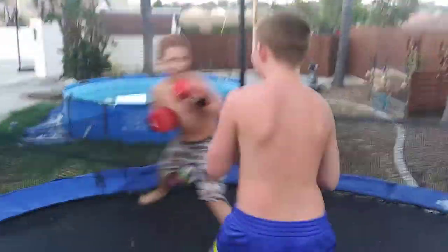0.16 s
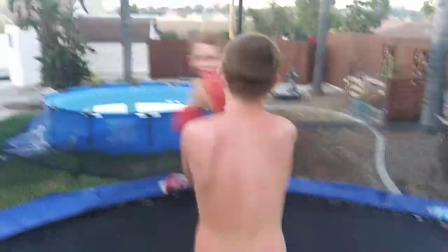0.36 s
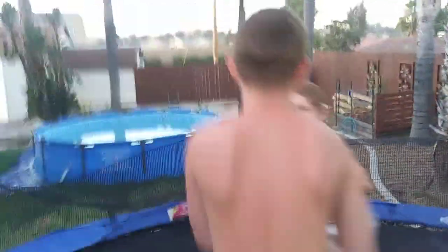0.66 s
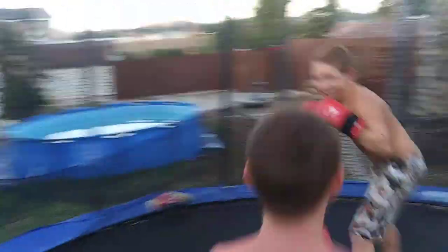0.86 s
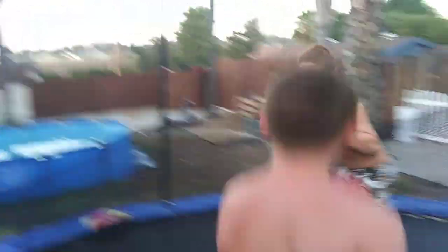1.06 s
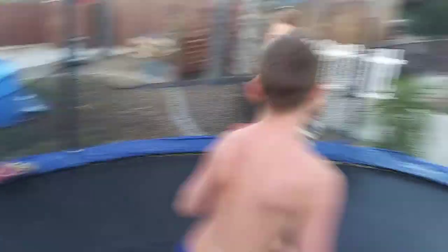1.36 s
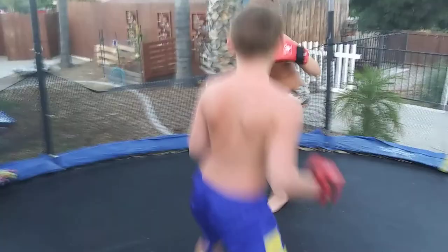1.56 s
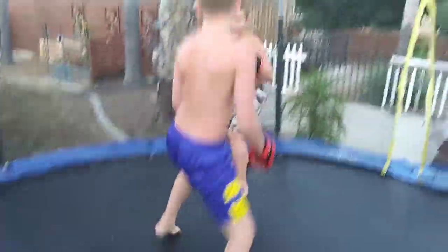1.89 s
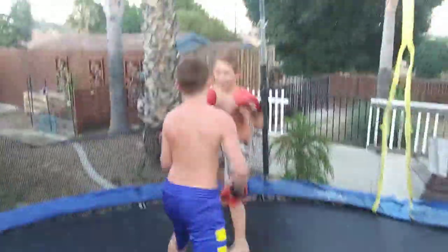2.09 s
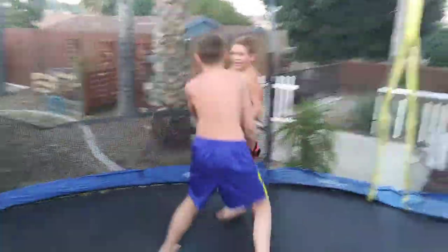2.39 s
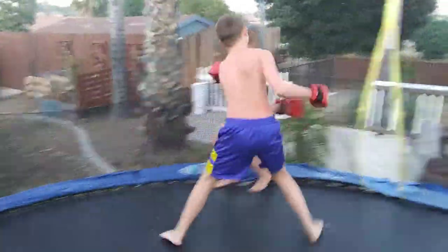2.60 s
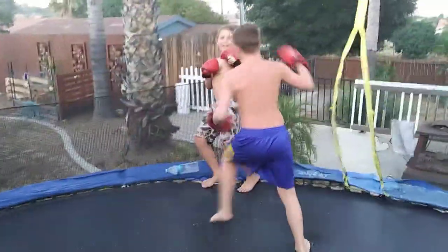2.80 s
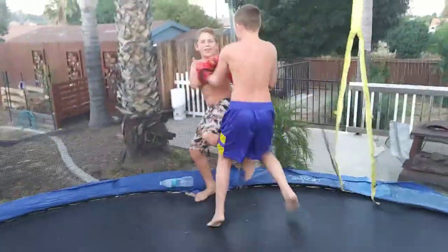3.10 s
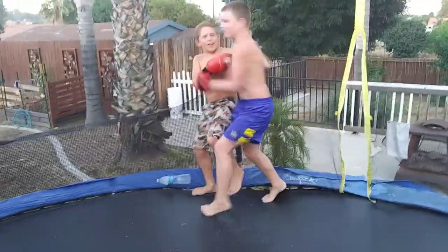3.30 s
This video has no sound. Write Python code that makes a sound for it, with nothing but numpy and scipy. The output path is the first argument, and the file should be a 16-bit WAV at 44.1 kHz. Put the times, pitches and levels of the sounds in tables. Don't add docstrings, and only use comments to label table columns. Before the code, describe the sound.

Trampoline mat and springs rattle under shuffling feet, ending in one sharp glove punch

```python
import sys
import numpy as np
from scipy import signal
from scipy.io import wavfile
from scipy.ndimage import uniform_filter1d

SR = 44100
rng = np.random.default_rng(int(sys.argv[2]) if len(sys.argv) > 2 else 0)


def decibels_to_gain(level_db):
    exponent = np.asarray(level_db, float) / 20
    return 10 ** exponent


def output_pcm(signal):
    pcm = np.clip(np.atleast_2d(signal).T, -1, 1) * 32767
    wavfile.write(sys.argv[1], SR, np.round(pcm).astype(np.int16))


N = 152145
CONTROL_STEP = 32
CONTROL_SIZE = N // CONTROL_STEP + 2

# peak_s, level_db, rise_s, fall_s, tilt_db_per_octave
DRAGS = [(.006, -32, 0.035, 0.045, -3), (.08, -31, 0.024, 0.12, -1.5), (.111, -30, 0.0055, 0.023, -3),
         (.15, -35, 0.024, 0.061, -2.5), (.28, -29.5, 0.051, 0.022, -1.5), (.341, -32.5, 0.026, 0.014, -2),
         (.375, -27.5, 0.014, 0.02, -1.5), (.43, -38, 0.025, 0.053, -1), (.487, -34, 0.0057, 0.0099, -2.5),
         (.56, -36.5, 0.016, 0.06, 0.5), (.7, -37.5, 0.086, 0.051, -3.5), (.853, -27.5, 0.0034, 0.033, -1),
         (1.572, -34.5, 0.012, 0.014, 0.5), (1.541, -38.5, 0.0027, 0.037, 1.5),
         (1.987, -41.5, 0.0065, 0.25, -3), (2.165, -29.5, 0.002, 0.017, 1.5),
         (2.21, -31.5, 0.065, 0.061, 0), (2.502, -27, 0.03, 0.021, -0.5), (2.602, -23, 0.025, 0.04, -1.5),
         (2.67, -31, 0.02, 0.038, -1), (3.139, -36, 0.037, 0.015, -1), (3.23, -39, 0.016, 0.18, -2.5),
         (3.334, -26, 0.006, 0.0039, -1), (3.41, -33, 0.096, 0.0091, -0.5)]
# peak_s, level_db, rise_s, fall_s, tilt_db_per_octave
SLIDES = [(.24, -30, 0.015, 0.024, 0), (.641, -31, 0.026, 0.027, 1), (.794, -33, 0.04, 0.046, 0),
          (.87, -28, 0.011, 0.0087, 1), (.91, -30, 0.028, 0.048, 0), (.965, -31.5, 0.011, 0.031, -0.5),
          (1.121, -40, 0.047, 0.02, 0), (1.163, -32.5, 0.022, 0.03, 0.5), (1.265, -31, 0.025, 0.035, 0.5),
          (1.302, -34.5, 0.013, 0.0056, -1), (1.225, -41, .006, .02, 0.5),
          (1.413, -31.5, 0.033, 0.022, -0.5), (1.489, -42, 0.01, 0.0075, 0.5),
          (1.654, -37.5, 0.061, 0.097, -0.5), (1.852, -35, 0.021, 0.0078, 1),
          (1.874, -32.5, 0.0095, .016, 0), (2.033, -26.5, 0.0028, 0.011, 1), (2.096, -32, 0.003, 0.0093, 2),
          (2.46, -35, 0.043, 0.065, 0), (2.55, -31, 0.0056, 0.06, 1), (2.74, -27.5, 0.034, 0.058, 0),
          (2.79, -26, 0.0097, 0.016, 1), (2.824, -31, 0.0077, 0.0058, 1), (3.0, -31.5, 0.06, 0.029, -0.5),
          (3.039, -27, 0.023, 0.017, 0.5), (3.091, -32, 0.015, 0.011, 2)]
# freq_hz, density_db_per_hz
DRAG_SPECTRUM = [(88, -86), (150, -44.5), (790, -11), (2400, -0.5), (5570, -3.5), (10200, -12),
                 (16000, -22)]
# freq_hz, density_db_per_hz
SLIDE_SPECTRUM = [(88, -71), (150, -34.5), (1480, -4), (1980, -3), (4670, -1), (10600, -13), (16000, -28.5)]
# freq_hz, density_db_per_hz
YARD_SPECTRUM = [(18, -69), (30, -39), (70, -33.5), (415, 0), (2750, 2), (5740, -6.5), (10800, -20.5),
                 (16000, -22)]
YARD_DB = -45
RISE_SHAPE, FALL_SHAPE = 2.4, 1.02
GRIT_PER_S, GRIT_SPREAD_DB, GRIT_SHARE = 2500, 4, 0.58

SPRING_T60_S, SPRINGS_DB, SPRINGS_PATCHY_DB = 0.057, -11.5, 7

# start_s, length_s, level_db, centre_hz, width_hz
SHEENS = [(.105, 0.012, -32, 4130, 500), (.106, 0.019, -29, 2340, 600), (0.121, 0.032, -33.5, 2090, 150),
          (0.224, 0.045, -37, 4085, 100), (.232, 0.023, -38.5, 2490, 150), (0.604, 0.043, -40.5, 8600, 900),
          (0.619, 0.076, -40, 5200, 900), (.77, 0.046, -45, 11000, 1200), (.785, 0.023, -46, 9000, 500),
          (0.846, .012, -39, 2480, 500), (.858, .018, -36.5, 9900, 1200), (.88, .012, -42, 11000, 1200),
          (0.947, 0.079, -44.5, 10860, 1000), (1.15, 0.048, -47, 5400, 200),
          (1.269, 0.051, -40, 8100, 2500), (1.243, 0.066, -52, 14000, 3500),
          (1.394, 0.049, -50, 14000, 3500), (2.153, .02, -49, 12000, 5000),
          (1.396, 0.035, -47.5, 10500, 805), (1.401, 0.044, -40, 5200, 900), (1.407, 0.037, -43, 2760, 200),
          (1.552, .04, -48, 11400, 800), (1.656, .035, -56, 5270, 120), (1.978, 0.018, -41, 4730, 350),
          (2.464, 0.059, -32, 4480, 1500), (2.575, 0.065, -30.5, 4460, 1500),
          (2.698, .05, -38.5, 4620, 500), (2.78, 0.045, -39.5, 1516, 150), (3.216, 0.059, -49, 6500, 1200),
          (3.322, 0.0098, -38, 4540, 700), (3.334, .008, -31, 3900, 900), (3.353, 0.014, -29.5, 4200, 2580),
          (3.373, .011, -29.5, 4740, 2640)]

# start_s, length_s, slip_rate_hz, level_db, loudest_ring_hz
SQUEAKS = [
    (0.182, 0.031, 865, -31.5, 1720),
    (1.203, 0.026, 754, -45, 1520),
    (1.55, 0.038, 870, -44, 1760),
    (1.843, 0.02, 900, -46, 1800),
    (1.98, 0.015, 1160, -43.5, 2300),
    (2.486, 0.036, 890, -39, 1720),
]
# start_s, length_s, slip_rate_hz, level_db, loudest_ring_hz
CREAKS = [
    (.896, .027, 592, -32, 2950),
    (1.142, .02, 510, -40, 2550),
]
# start_s, length_s, slip_rate_hz, level_db, loudest_ring_hz
GROAN = [
    (1.084, .056, 532, -35.5, 2580),
]
SQUEAK_SAG, GROAN_SAG, SQUEAK_JITTER = 0.04, 0.15, 0.006
RING_WIDTH_OCT, COIL_WIDTH_OCT, COIL_HZ = 0.15, 0.06, 5200
FLICKER_DB = 4

# start_s, peak_db, pitch_hz
TICKS = [(0.221, -34, 4070), (0.8674, -17, 6200), (1.1619, -23, 5200), (1.7534, -25.5, 6000),
         (2.0323, -24, 4130), (2.165, -16.5, 3270), (2.1851, -19.5, 5700), (2.3705, -22.5, 4670),
         (2.4085, -22.5, 4730), (2.4266, -18.5, 4800), (2.4478, -22, 5540), (2.461, -21, 5400),
         (2.7576, -14, 4560), (2.78, -20, 5400), (3.086, -16.5, 4450), (3.278, -18, 3500),
         (3.29, -22.5, 2920), (3.316, -32, 3200), (1.5386, -31, 6500), (1.7813, -29, 4130),
         (1.8535, -25, 5000), (1.8698, -23.5, 4840)]
TICK_T60_S, TICK_DB = 0.0049, -3
TICK_TAIL_T60_S, TICK_TAIL_DB = 0.058, -10

# start_s, peak_db, pitch_hz, t60_s
KNOCKS = [(0.2995, -18.5, 1670, 0.004), (.317, -15.5, 610, 0.0034), (0.3686, -21.5, 990, 0.033),
          (3.0627, -18, 1400, 0.0096), (3.0727, -18.5, 760, 0.0074), (3.28, -6.5, 1020, 0.0055),
          (3.2879, -20.5, 814, 0.02), (3.3, -26, 990, 0.021), (3.316, -22, 754, 0.012),
          (3.337, -23.5, 920, 0.012), (3.341, -25.5, 860, 0.016)]
KNOCK_PUFF_DB, KNOCK_PUFF_LONGER = -13, 2.8
# freq_hz, peak_db, t60_s, delay_s
PUNCH = [
    (1500, -6, .0025, 0),
    (4200, -15, .004, 0),
    (2900, -16, .002, 0),
    (700, -6, .011, .0004),
]
PUNCH_S = 3.2747

# start_s, level_db, t60_s, rise_s
HEELS = [
    (.365, -29, 0.097, .002),
    (1.235, -39, 0.26, 0.0086),
    (2.161, -31, 0.098, 0.0017),
    (2.198, -37.5, 0.1, 0.0023),
    (2.321, -49, .1, 0.004),
    (2.445, -39, 0.069, 0.0023),
    (2.933, -33, 0.12, 0.0019),
    (3.062, -35, 0.22, 0.0019),
    (3.278, -45, 0.28, 0.0093),
]
HEEL_LOW_HZ, HEEL_HIGH_HZ = 285, 1400

# delay_s, level_db
ECHOES = [
    (.014, -19),
    (.04, -25),
]
ECHO_CUT_HZ, BASS_CUT_HZ = 2500, 452
# freq_hz, t60_s, lift_db
MIC_PEAKS = [
    (3490, 0.0043, -5.5),
    (5880, 0.0022, 2.5),
    (10460, 0.011, 5),
]


def rms_one(x):
    return x / np.sqrt(np.mean(x ** 2) + 1e-20)


def at_hz(spectrum, hz):
    table_hz, table_db = np.transpose(spectrum)
    return np.interp(np.log(hz), np.log(table_hz), table_db)


def drift(rate_hz):
    r = np.exp(-2 * np.pi * rate_hz * CONTROL_STEP / SR)
    noise = rng.standard_normal(CONTROL_SIZE + 2000)
    return rms_one(signal.lfilter([1], [1, -2 * r, r * r], noise)[2000:])


def to_audio_rate(control):
    return np.interp(np.arange(N) / CONTROL_STEP, np.arange(CONTROL_SIZE), control)


def ring(x, hz, t60_s):
    r = decibels_to_gain(-60 / (t60_s * SR))
    w = 2 * np.pi * hz / SR
    return signal.lfilter([0, np.sin(w)], [1, -2 * r * np.cos(w), r * r], x)


def butter(x, order, cut_hz, kind="low"):
    return signal.sosfilt(signal.butter(order, cut_hz, kind, fs=SR, output="sos"), x)


def add(out, start_s, piece):
    i = int(start_s * SR)
    out[i:i + len(piece)] += piece[:N - i]


def swell_power(rows, spectrum, hz, t):
    peak_s, level_db, rise_s, fall_s, tilt_db = (c[:, None] for c in np.transpose(rows))
    rising = t < peak_s
    away = np.where(rising, (peak_s - t) / rise_s, (t - peak_s) / fall_s)
    envelope_db = level_db - 6 * away ** np.where(rising, RISE_SHAPE, FALL_SHAPE)
    octaves = np.log2(hz / 4000) + 2 * np.clip(np.log2(hz / 6000), 0, 1)
    shape = decibels_to_gain(at_hz(spectrum, hz) + tilt_db * octaves) ** 2 * hz
    shape = shape / shape.sum(axis=1, keepdims=True)
    return shape.T @ decibels_to_gain(envelope_db) ** 2


def mat_and_yard(patchy_db, shared_db):
    edges_hz = 30 * 2 ** (np.arange(29) / 3)
    hz = np.sqrt(edges_hz[1:] * edges_hz[:-1])
    t = np.arange(CONTROL_SIZE) * CONTROL_STEP / SR
    feet = swell_power(DRAGS, DRAG_SPECTRUM, hz, t) + swell_power(SLIDES, SLIDE_SPECTRUM, hz, t)
    air = decibels_to_gain(at_hz(YARD_SPECTRUM, hz)) ** 2 * hz
    air = decibels_to_gain(YARD_DB) ** 2 * air / air.sum()

    catch = rng.random(N) < GRIT_PER_S / SR
    height = decibels_to_gain(GRIT_SPREAD_DB * np.minimum(rng.exponential(1, N), 5))
    grit = rms_one(height * rng.choice([-1, 1], N) * catch)
    white = rng.standard_normal((2, N))
    judder = drift(105)
    out = np.zeros(N)
    for k in range(len(hz)):
        source = np.sqrt(GRIT_SHARE) * grit + np.sqrt(1 - GRIT_SHARE) * white[k % 2]
        band = rms_one(butter(source, 2, edges_hz[k:k + 2], "band"))
        flutter_db = shared_db * judder + patchy_db * drift(13.3)
        out += band * to_audio_rate(np.sqrt(feet[k] * decibels_to_gain(flutter_db) ** 2 + air[k]))
    return out


def springs(mat):
    pitches_hz = np.geomspace(900, 13000, num=64) * rng.uniform(.98, 1.02, 64)
    out = np.zeros(N)
    for k, hz in enumerate(pitches_hz):
        gain = to_audio_rate(decibels_to_gain(SPRINGS_PATCHY_DB * np.tanh(drift(8))))
        out += (-1) ** k * ring(gain * mat, hz, SPRING_T60_S) * np.sqrt(hz)
    return decibels_to_gain(SPRINGS_DB) * rms_one(out) * np.std(mat)


def sheens():
    out = np.zeros(N)
    for start_s, length_s, level_db, hz, width_hz in SHEENS:
        u = np.linspace(0, 1, int(length_s * SR))
        t60_s = np.log(1000) / np.pi / width_hz
        hiss = rng.standard_normal(6000)
        tone = rms_one(ring(ring(hiss, hz, t60_s), hz, t60_s))[2000:2000 + len(u)]
        add(out, start_s, decibels_to_gain(level_db) * np.sin(np.pi * u ** .7) * tone)
    return out


def squeaks(rows, sag, coil_db, others_db, fade):
    out = np.zeros(N)
    k = np.arange(1, 13)[:, None]
    for start_s, length_s, rate_hz, level_db, ring_hz in rows:
        u = np.linspace(0, 1, int(length_s * SR))
        waver = rms_one(uniform_filter1d(rng.standard_normal(4000), size=150))[:len(u)]
        slips_hz = rate_hz * (1 + sag * ((1 - u) ** 3 - .25))
        turns = np.cumsum(slips_hz * (1 + SQUEAK_JITTER * waver)) / SR

        wander = rms_one(uniform_filter1d(rng.standard_normal((12, 4000)), size=400))[:, :len(u)]
        others = decibels_to_gain(FLICKER_DB * wander) * decibels_to_gain(others_db) / k ** fade
        others = others * np.tanh((k * rate_hz / 800) ** 4)
        hook = decibels_to_gain(-6 * (np.log2(k * slips_hz / ring_hz) / RING_WIDTH_OCT) ** 2)
        coil = decibels_to_gain(coil_db - 6 * (np.log2(k * slips_hz / COIL_HZ) / COIL_WIDTH_OCT) ** 2)
        tones = (hook + coil + others) * np.sin(2 * np.pi * k * turns + k ** 2)
        envelope = np.sin(np.pi * u ** (1 + 4 * sag)) ** 0.56
        add(out, start_s, decibels_to_gain(level_db) * envelope * rms_one(tones.sum(axis=0)))
    return out


def ticks():
    out = np.zeros(N)
    t = np.arange(SR // 10) / SR
    for start_s, peak_db, hz in TICKS:
        hiss = rng.standard_normal(len(t))
        shiver = rms_one(ring(hiss, hz, 0.0013)) + 0.19 * np.gradient(hiss)
        shiver = shiver * decibels_to_gain(TICK_TAIL_DB - 60 * t / TICK_TAIL_T60_S)
        add(out, start_s + 0.000947, decibels_to_gain(peak_db + TICK_DB) * (ring(t == 0, hz, TICK_T60_S) + shiver))
    return out


def knocks():
    out = np.zeros(N)
    t = np.arange(SR // 5) / SR
    for start_s, peak_db, hz, t60_s in KNOCKS:
        puff = rms_one(ring(rng.standard_normal(len(t)), hz, 0.95 / hz))
        puff = puff * decibels_to_gain(KNOCK_PUFF_DB - 60 * t / (t60_s * KNOCK_PUFF_LONGER))
        puff = puff * np.minimum(t * hz, 1)
        add(out, start_s, decibels_to_gain(peak_db) * (ring(t == 0, hz, t60_s) + puff))
    for hz, peak_db, t60_s, delay_s in PUNCH:
        add(out, PUNCH_S + delay_s, decibels_to_gain(peak_db) * ring(t == 0, hz, t60_s))
    return butter(out, 2, 6000)


def heels():
    out = np.zeros(N)
    t = np.arange(SR // 3) / SR
    for start_s, level_db, t60_s, rise_s in HEELS:
        burst = rng.standard_normal(len(t)) * np.tanh(t / rise_s) ** 2 * decibels_to_gain(-60 * t / t60_s)
        thud = butter(burst, 3, [HEEL_LOW_HZ, HEEL_HIGH_HZ], "band")
        add(out, start_s, decibels_to_gain(level_db + 12) * thud)
    return out


def scene():
    mat = mat_and_yard(patchy_db=1.0, shared_db=1.21)
    sharp = sheens() + ticks() + knocks()
    sharp += squeaks(SQUEAKS, SQUEAK_SAG, coil_db=-30, others_db=-10, fade=1.4)
    sharp += squeaks(CREAKS, SQUEAK_SAG, coil_db=2, others_db=-3, fade=.25)
    sharp += squeaks(GROAN, GROAN_SAG, coil_db=5, others_db=-3, fade=.05)
    sharp = butter(sharp, 4, BASS_CUT_HZ, "high")
    out = mat + springs(mat) + sharp + heels()
    dull = butter(sharp, 1, ECHO_CUT_HZ)
    for delay_s, level_db in ECHOES:
        add(out, delay_s, decibels_to_gain(level_db) * dull)
    return out[None]


def band_limit(x):
    return signal.sosfilt(signal.butter(12, 16290, fs=SR, output="sos"), x)


def record(dry):
    for hz, t60_s, lift_db in MIC_PEAKS:
        b, a = signal.iirpeak(hz, hz * t60_s / 2.2, fs=SR)
        dry = dry + (decibels_to_gain(lift_db) - 1) * signal.lfilter(b, a, dry)
    mix = signal.sosfilt(signal.cheby2(12, 60, 16100, fs=SR, output="sos"), dry)
    return band_limit(mix)


dry = scene()
out = record(dry)
output_pcm(out)
```